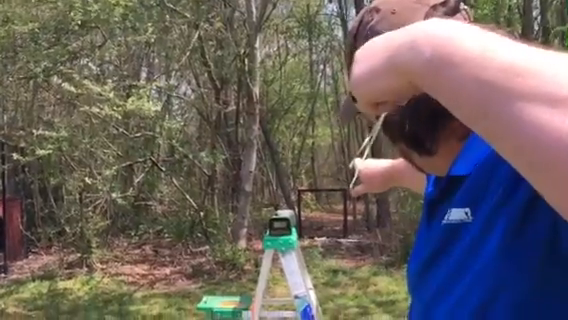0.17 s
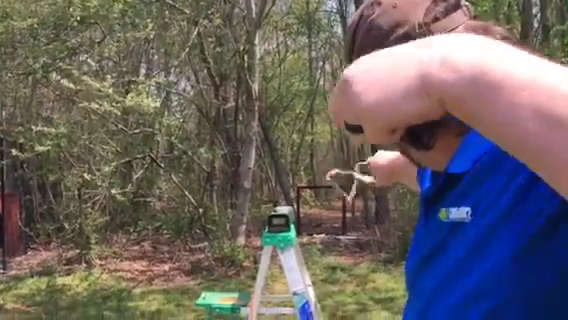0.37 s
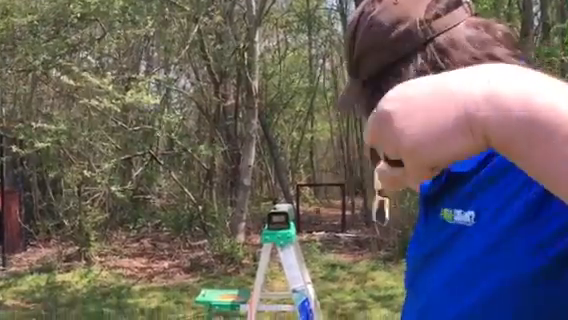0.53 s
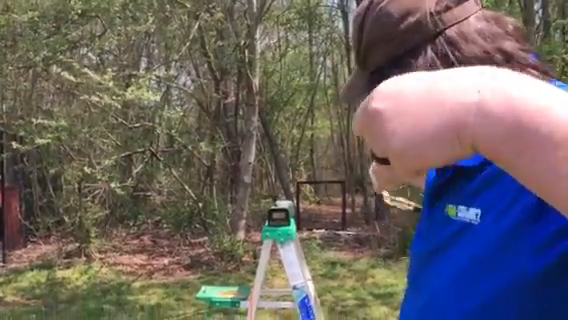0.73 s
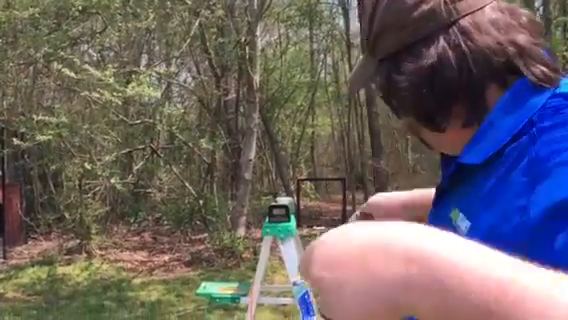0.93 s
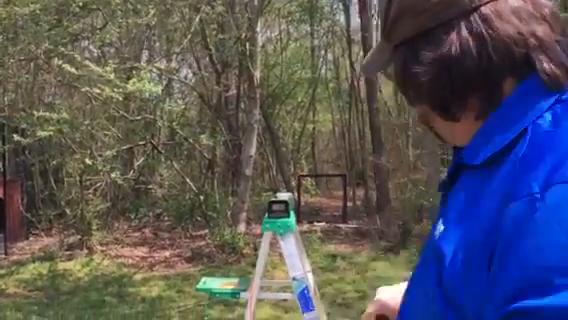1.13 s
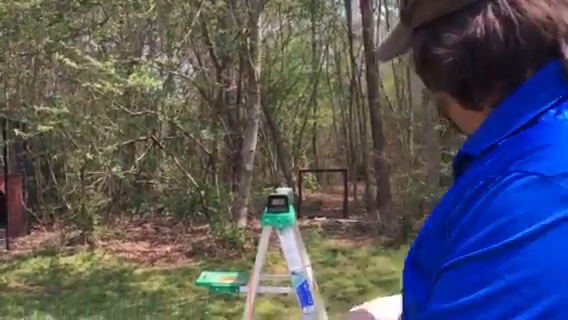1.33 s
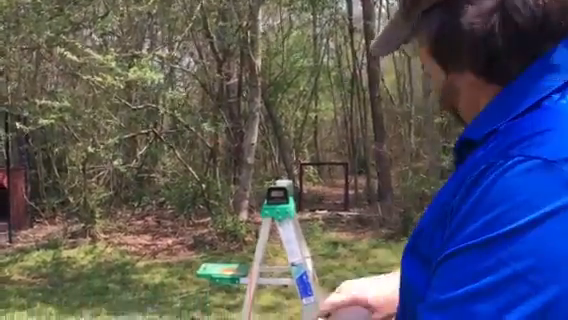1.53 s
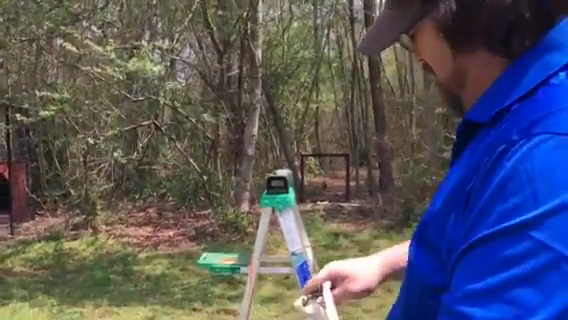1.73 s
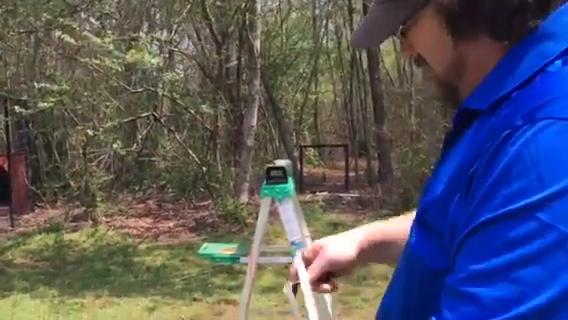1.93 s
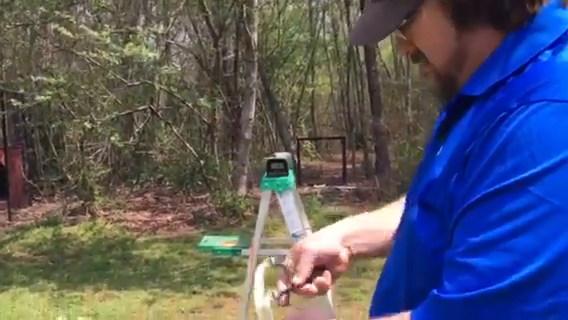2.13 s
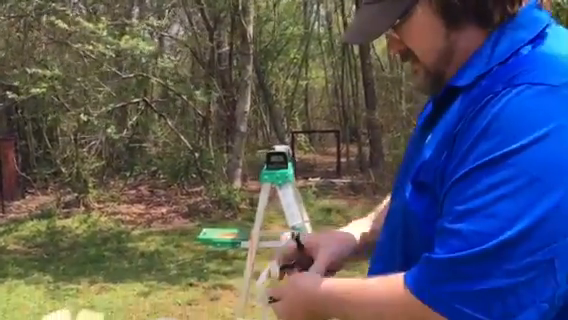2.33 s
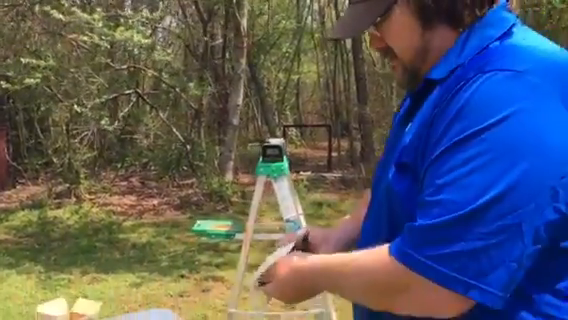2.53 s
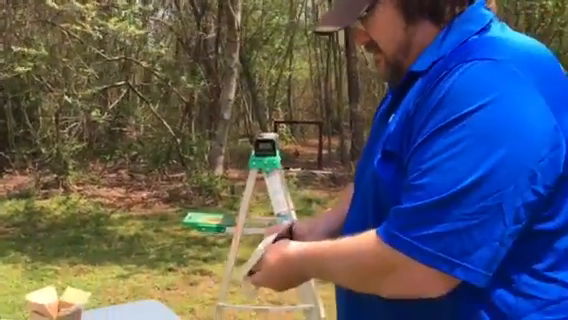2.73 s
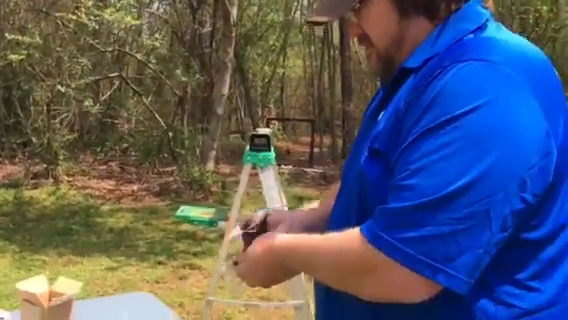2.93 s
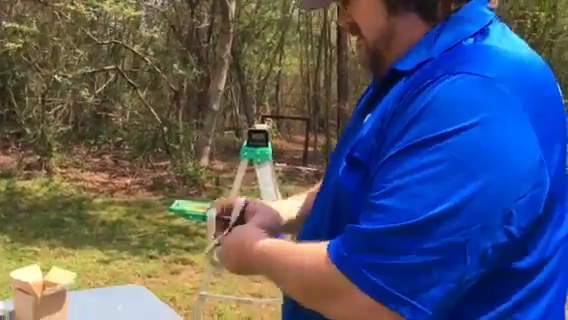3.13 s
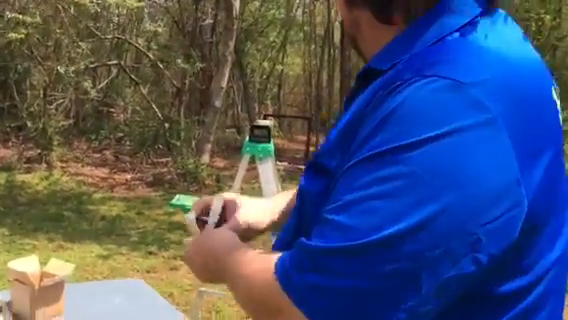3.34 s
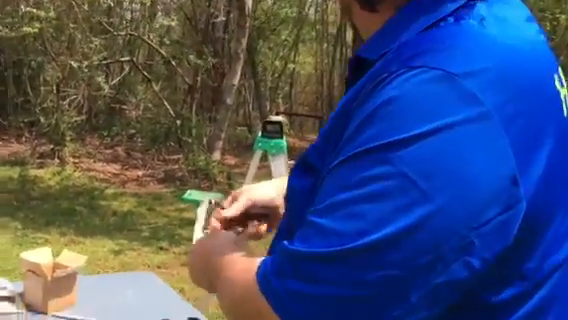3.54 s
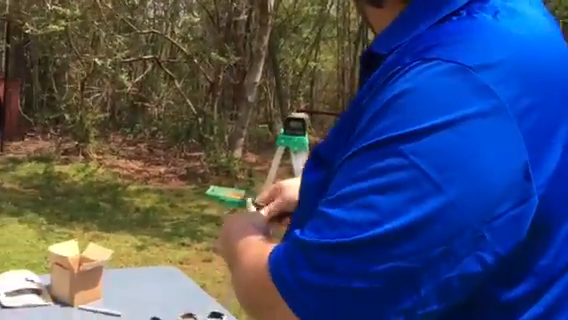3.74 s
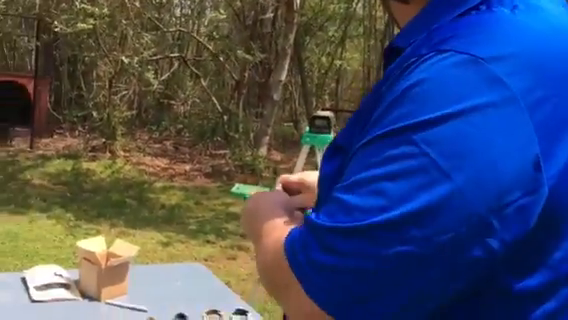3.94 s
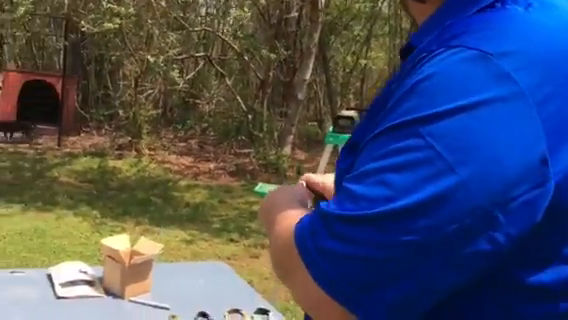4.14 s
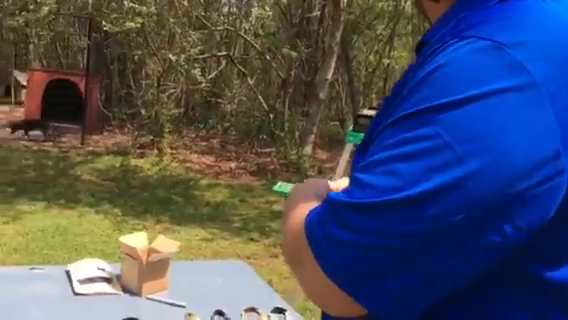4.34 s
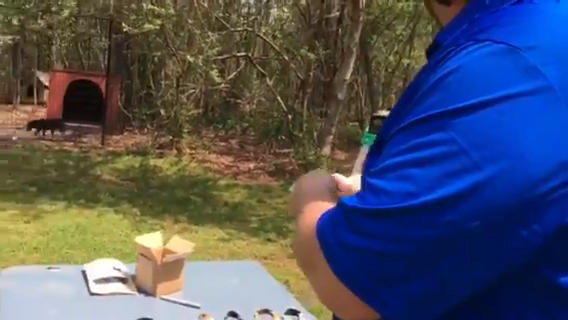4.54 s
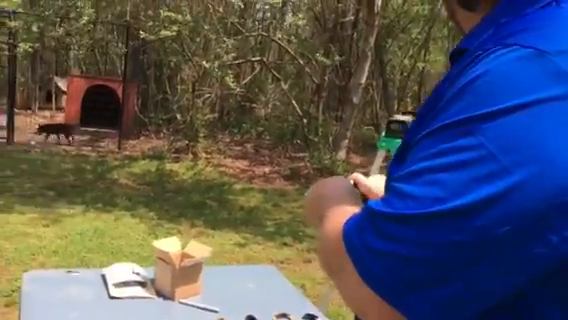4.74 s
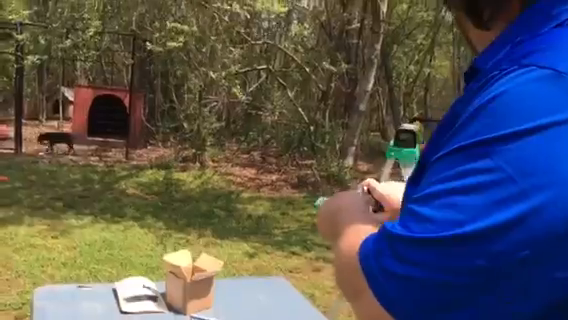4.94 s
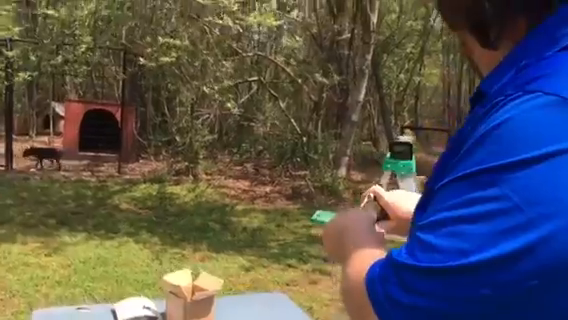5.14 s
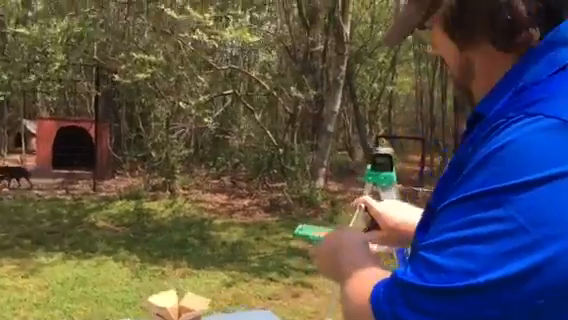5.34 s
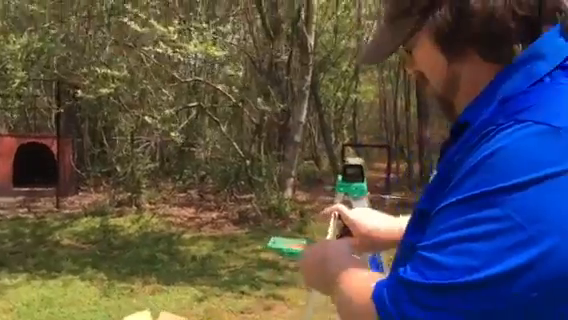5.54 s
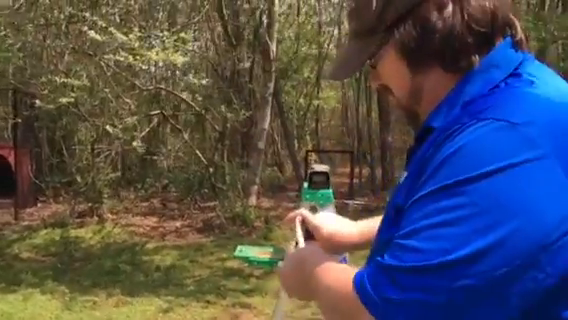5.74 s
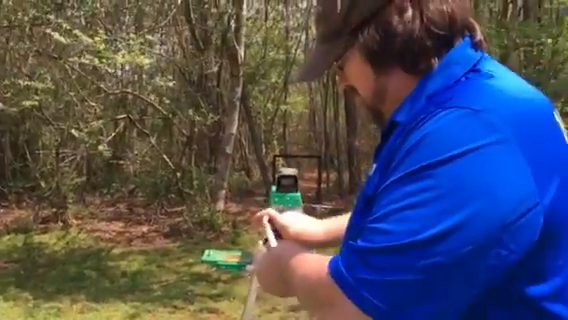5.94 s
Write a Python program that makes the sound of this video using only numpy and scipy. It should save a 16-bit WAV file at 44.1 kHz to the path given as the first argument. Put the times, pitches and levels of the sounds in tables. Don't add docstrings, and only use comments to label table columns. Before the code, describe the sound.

Sharp double rubber slap, then a bright metallic hit with a hissing echo off trees; the can tumbles, leaving quiet birds, wind and small rustles.

```python
import sys
import numpy as np
from scipy import signal
from scipy.fft import rfft, irfft, next_fast_len
from scipy.io import wavfile
from scipy.ndimage import uniform_filter1d, map_coordinates

SR = 44100
rng = np.random.default_rng(int(sys.argv[2]) if len(sys.argv) > 2 else 0)


def to_linear_factor(level_db):
    exponent = np.asarray(level_db, float) / 20
    return 10 ** exponent


def store_pcm(level_fs):
    pcm = np.round(np.clip(level_fs, -1, 1) * 32767).astype(np.int16)
    wavfile.write(sys.argv[1], SR, np.atleast_2d(pcm).T)


N = 268128
CLOCK = np.arange(N) / SR

# [t/s, swish level/dB]
WHIPS = [
    (.398, -32),
    (0.429, -43),
]
# [f/Hz, level/dB per Hz]
SWISH_COLOUR = [(180, -31.5), (300, -13), (737, -4), (1900, -14), (4670, -15), (5080, -16), (6410, -11),
                (16000, -19.5)]
# [t/s of the peak, level/dB, brightness 0-1, fall/s]
SLAPS = [(0.3705, -50.5, 0.8, 0.0016), (.378, -41, 0.45, 0.00047), (.388, -36, .6, .003),
         (0.397, -28.5, .1, 0.00087), (.4, -15, 0.74, 0.0019), (.4045, -19.5, 0.54, 0.0015),
         (0.408, -25, 0.9, 0.00082), (0.413, -32, 0.1, 0.0015), (0.4301, -15, .05, 0.0023),
         (0.4319, -24, .08, .001), (.435, -20.5, 0.46, 0.0015), (0.4369, -21.5, 0.4, .0012),
         (.44, -28.5, 0.01, .003)]
# [f/Hz, level/dB per Hz]
DULL_SLAP = [(180, -47), (300, -12), (1360, -18), (2320, -2.5), (3130, -8), (8790, -11.5), (10200, -13),
             (13300, -6.5), (16000, -15.5)]
BRIGHT_SLAP = [(180, -57.5), (300, -8), (3080, -9), (4370, -27), (6620, -3.5), (8500, -9), (10200, -12),
               (11700, -6.5), (16000, -12.5)]
# [t/s, level/dB]
POUCH_SNAPS = [
    (.4317, -6.5),
    (.4366, -11.5),
]
# [f/Hz, level/dB per Hz]
SLAP_SCATTER = [(290, -42.5), (500, -12), (545, -22.5), (631, -13.5), (1870, -10.5), (2190, -6.5),
                (3540, -4.5), (12100, -4.5), (16000, -18.5)]
SWISH_RISE_S, SWISH_FALL_S = 0.0085, 0.018
PUFF_S, PUFF_HOLD_S, PUFF_DB, PUFF_RISE_S, PUFF_FALL_S = 0.385, 0.041, -44, 0.0078, 0.015
FLAP_HZ, FLAP_DB = 185.3, -8
SLAP_RISE = 0.44

# [t/s, level/dB]
STRIKE = [
    (0.5765, -6.5),
    (.5767, -5),
    (.5775, -6.5),
    (0.579, -9),
    (0.582, -9),
]
# [f/Hz, level/dB per Hz]
CRACK = [(200, -40.5), (400, -9), (600, -3.5), (850, 0), (1250, -1.5), (1750, -14), (2450, -3), (3000, -13),
         (3600, -5.5), (6400, -2.5), (8500, -8.5), (12000, -10.5), (16000, -19.5)]
# [t/s, level/dB, ring level/dB, contact time/s, best-driven f/Hz]
BLOWS = [(0.5764, -15, -7, 0.00014, 2570), (.648, -43, 8, 0.0015, 3360), (.746, -34, -5.5, 0.0023, 1070),
         (1.022, -50.5, -1, 0.02, 3700), (1.073, -42.5, 0, 0.024, 3500), (1.099, -37.5, 2.5, 0.0018, 4230),
         (1.108, -39, 2, 0.0066, 1437), (1.146, -36, -15, 0.012, 3500), (1.272, -41.5, -6.5, 0.0047, 837),
         (1.3, -50, 3, 0.0019, 1437), (1.413, -52.5, 0, .002, 837), (1.465, -60.5, 7, 0.0024, 3400),
         (1.508, -64.5, 13.5, 0.0042, 4320), (1.689, -57, 6.5, 0.003066, 1516)]
# [f/Hz, level/dB, t60/s]
CAN_MODES = [(530, -8.5, 0.07), (837, -5.5, 0.31), (942, -5.5, 0.3), (1023, -12.5, 0.16), (1130, -6, .15),
             (1264, -2, 0.18), (1437, -4, 0.4), (1770, -6.5, 0.075), (2370, 0, 0.085), (2470, 0, 0.13),
             (2774, -8.5, .15), (3300, -1.5, .08), (3416, 3.5, 0.073), (3909, -1.5, 0.13),
             (4230, -1.5, .12), (5160, -1.5, 0.11), (5600, -2, 0.18), (5970, -3, .07), (6650, -0.5, 0.081),
             (7276, -2, 0.077)]
# [f/Hz, level/dB per Hz]
CLATTER = [(180, -53), (300, -28), (634, -15), (787, -17.5), (885, -6), (1720, -9.5), (3080, -6.5),
           (3350, -5), (3890, -6.5), (6960, -6.5), (16000, -18.5)]
ROLL = [(240, -59.5), (400, -38.5), (528, -3), (655, -22), (801, -3.5), (1440, -7), (2050, -6), (2500, -1),
        (4600, -2.5), (5000, -3), (9000, -6), (16000, -18)]
# [f/Hz, t60/s]
TREES = [(300, 0.16), (900, 0.64), (2000, 0.94), (4000, 0.59), (8000, .4), (14000, 0.3)]
TAIL_FOLLOWS, TAIL_UP_DB, TAIL_DOWN_DB = 0.6, 4, 0.5

# [t/s, level/dB, f/Hz, rise/s, t60/s]
PANEL_RINGS = [(.38, -43, 191, .004, 0.045), (.398, -33, 176, 0.0036, .05),
               (.43, -33.5, 170, 0.0027, 0.043), (.4295, -20, 3390, 0.001, 0.013),
               (.436, -28.5, 2270, .001, .012), (.647, -31, 3340, .002, 0.037),
               (.7465, -35, 1000, 0.0019, 0.037), (.749, -36, 3950, 0.0018, .04),
               (.584, -29, 1425, .003, .1), (.62, -37, 1130, 0.0046, .1), (.655, -38, 887, .004, 0.072),
               (0.709, -44, 1290, .005, .1), (.762, -43.5, 946, .004, 0.11), (.79, -44.5, 1440, .006, 0.18),
               (.83, -50, 1246, 0.0074, 0.18), (.8, -49, 897, 0.0054, 0.11),
               (1.073, -40.5, 3400, .006, .06), (1.075, -45, 4430, .005, .06),
               (1.088, -42, 2740, 0.0033, .06), (1.099, -37, 4400, .002, .05),
               (1.103, -45, 1450, 0.0049, .15), (1.085, -45, 1000, 0.0035, .06),
               (1.105, -49, 2486, 0.0036, .08), (1.105, -53, 800, .004, .12),
               (1.114, -42, 4310, .002, 0.058), (1.125, -43, 2800, .004, .08),
               (1.165, -47, 3300, .008, .08), (1.273, -45, 2570, 0.0035, 0.064),
               (1.276, -46, 832, .003, 0.058), (1.298, -47, 1460, 0.0027, .05)]
# [t/s, level/dB, rise/s per 10 dB, fall/s per 10 dB]
FORK_KNOCKS = [
    (3.05, -62.5, .03, 0.062),
    (3.105, -59, 0.0036, 0.0066),
]

# [t/s of the peak, level/dB, rise/s per 10 dB, fall/s per 10 dB, fullness 0-1]
STROKES = [(1.9, -70, .006, 0.06316, 0.36), (1.986, -65, 0.0091, 0.01418, 0.2915),
           (2.226, -69.5, .018, 0.068, 0.88), (2.68, -74, 0.22, 0.18, 0.55),
           (2.808, -64, 0.02593, 0.054, 0.31), (3.054, -52, 0.02, 0.022, 0.52),
           (3.075, -64, 0.016, 0.02, 0.58), (3.11, -69, .015, 0.17, 0.56),
           (3.77, -75.5, 0.0326, .04, 0.8137), (3.81, -61, 0.028, .025, .65),
           (4.668, -69.5, 0.068, 0.059, 0.36), (5.478, -53, 0.0088, 0.021, 0.32),
           (5.505, -58, 0.0093, 0.013, 0.48), (5.523, -49.5, 0.017, 0.0075, 1),
           (5.55, -78, 0.016, 0.047, 0.99), (5.879, -77.5, 0.098, .15, 0.66),
           (5.992, -67.5, 0.035, 0.15, 0.65)]
# [f/Hz, level/dB per Hz]
THIN_RUSTLE = [(2500, -18), (4500, -12), (6000, 5), (8000, 0.5), (11500, 2.5), (16000, -9)]
FULL_RUSTLE = [(470, -66), (800, -29), (1660, 1.5), (1850, -10), (2440, -4), (2800, -3.5), (6090, -7),
               (10600, -26), (12100, -31), (16000, -48)]
# [t/s, level/dB, f/Hz, broad crack level/dB]
TICKS = [(1.99, -68, 7970, -15.5), (2.059, -61.5, 4280, -15), (2.225, -69, 7147, -6),
         (2.553, -72.5, 11000, -3), (2.644, -65, 10000, -4), (2.657, -68, 6170, -10),
         (2.748, -59.5, 3020, -19), (2.838, -63, 11500, -2.5), (2.907, -71.5, 10600, -4),
         (2.94, -72, 11470, -8), (2.988, -71, 13000, -8), (3.212, -64, 5970, -2),
         (2.809, -57.5, 11250, -6.5), (3.053, -51.5, 4366, 4), (3.076, -59, 3126, -9.5),
         (3.101, -54, 2240, -16), (3.338, -55, 6880, 7), (3.34, -52.5, 1830, -7.5), (3.802, -61, 6470, -4),
         (4.989, -63, 4310, 5), (5.035, -69, 9000, -3), (5.475, -52, 8100, -7), (5.504, -53, 2350, 10),
         (5.518, -45.5, 1520, -16), (5.769, -66, 6560, -5)]
# [f/Hz, level/dB per Hz]
SNICK = [(700, -30), (2000, -3), (6000, -12), (11000, -8), (16000, -14)]

# [t/s, length/s, f/Hz, glide/Hz, level/dB]
HIGH_BIRD = [(0, .17, 7006, 201.2, -72.5), (5.55, 0.19, 7000, 199, -73)]
MID_BIRD = [(.04, 0.1, 3205, -52, -80), (.23, 0.12, 2990, 199, -74.5), (2.28, 0.16, 3270, 42, -76),
            (2.87, .18, 3184, 32.5, -73), (3.55, 0.13, 3075, 41.5, -69.5)]
LOW_BIRD = [(1.34, 0.067, 2630, 20, -58.5), (1.66, 0.075, 2614, -80, -62), (1.72, 0.089, 1890, -43, -68),
            (1.81, 0.095, 2480, 38, -63), (2.07, 0.065, 1680, 9.5, -66), (1.97, 0.12, 2520, 79, -73),
            (2.22, 0.086, 2065, -20, -66), (2.29, 0.096, 1790, 600, -63.5), (2.35, .06, 2305, 20.5, -61.5),
            (2.36, 0.16, 2510, -18.5, -64), (2.77, 0.062, 2430, -84, -68), (3.38, .055, 1990, -320, -68.5),
            (3.44, 0.053, 2370, 40, -63)]
THIN_BIRD = [(5.54, .22, 5540, -20, -81), (5.82, .09, 5930, 80, -78)]
HOARSE_BIRD = [(2.55, 0.15, 3474, -17, -70.5)]
# [t/s from start, f/Hz, level/dB]
SLUR = [(0, 2270, -8.5), (.012, 2269, 11.5), (.03, 2220, 7), (.055, 1900, 4.5), (.09, 1650, 2.5),
        (.125, 1506, 2.5), (.14, 1460, -27)]
PAIR = [(0, 3170, -12), (.012, 3245, 4), (.026, 3330, 2), (.036, 3562, 5), (.07, 3582, -3), (.13, 3560, -4),
        (.18, 3523, -9.5), (.32, 3510, -22)]
CHIP = [(0, 3896, -5), (.004, 3590, 4.5), (.011, 3302, -2), (.024, 3148, -12)]
# [t/s, level/dB]
SLURS = [(3.85, -72), (4.255, -71), (4.634, -67.5), (5.015, -69), (5.4, -70)]
PAIRS = [(3.775, -79), (4.17, -74), (4.55, -75), (4.925, -72), (5.315, -72.5)]
CHIPS = [(.022, -71), (.288, -65.5), (1.608, -65), (1.756, -68.5), (1.906, -66), (2.207, -65.5),
         (2.352, -69), (2.51, -65)]
NOTE_PEAK, NOTE_START_DB, NOTE_END_DB = 0.72, -2, -14
# [t/s, level/dB]
CHORUS = [
    (1.35, -94),
    (1.7, -67),
    (1.95, -74),
    (2.35, -74.5),
    (2.7, -79),
]

# [t/s, level/dB]
WIND = [(0, -67), (.42, -58), (.8, -61), (1.2, -59), (1.285, -52), (1.37, -60), (1.7, -63), (3, -62.5),
        (4.9, -63.5), (5.3, -57), (6.08, -58)]
# [f/Hz, level/dB per Hz]
BUFFET = [(12, -30.5), (25, -12), (40, -1), (55, 1), (75, -5.5), (95, -10), (140, -47)]
RUMBLE = [(41, -35), (70, 1), (103, 1), (259, -10.5), (329, -18.5), (357, -20), (500, -39), (650, -51),
          (1100, -120)]
LEAVES = [(180, -34), (300, -4), (1230, -8), (1450, -9.5), (1580, -10.5), (2090, -13.5), (3090, -18.5),
          (5000, -29.5), (6500, -54.5), (11000, -120)]
HISS = [(1760, -32), (3000, -10), (3750, -11.5), (4260, -5.5), (5000, -13), (5600, -4), (6300, -7),
        (9400, -11), (16000, -19.5)]
BUFFET_DB, RUMBLE_DB, LEAVES_DB, HISS_DB = 0.5, -59.5, -66, -79.5
LATE_S, LATE_LEAVES_DB, LATE_HISS_DB, LATE_DB_PER_S = 0.59, -60.5, -62, 18.5
# [f/Hz, level/dB]
MIC = [(20, 0), (2550, -0.5), (2850, -3), (3100, 0.5), (9300, -0.5), (10400, -4.5), (11400, -1.5),
       (14500, -1.5), (15800, -2), (16000, -39), (16800, -59)]


def bands():
    speed = sum(to_linear_factor(db) * swell(s, SWISH_RISE_S, SWISH_FALL_S) for s, db in WHIPS)
    out = speed * to_linear_factor(3.4 * wobble(400)) * noise(SWISH_COLOUR)
    puff = to_linear_factor(PUFF_DB) * swell(PUFF_S, PUFF_RISE_S, PUFF_FALL_S, PUFF_HOLD_S)
    out += puff * noise([(50, -16), (130, -4.0), (210, -1.0), (300, -16.5), (1200, -39.5)])
    out += puff * to_linear_factor(FLAP_DB) * np.sin(2 * np.pi * FLAP_HZ * CLOCK + 0.9 * wobble(40))
    t = CLOCK[:SR // 25] - 0.01
    for s, db, bright, fall in SLAPS:
        turn = bright * np.pi / 2
        burst = np.cos(turn) * noise(DULL_SLAP, len(t)) + np.sin(turn) * noise(BRIGHT_SLAP, len(t))
        side = np.where(t < 0, SLAP_RISE * fall, fall)
        add(out, s + t[0], to_linear_factor(db) * np.exp(-np.abs(t / side) ** 0.81) * burst)
    snap = pulse([(400, -30.5), (2000, -8.5), (3400, 4.5), (5000, -13.5), (13000, -10.5), (16000, -15.5)])
    for s, db in POUCH_SNAPS:
        add(out, s, to_linear_factor(db) * snap)
    t = CLOCK[:SR // 2]
    for s, db in [(0.402, -46), (0.434, -41)]:
        add(out, s, to_linear_factor(db) * tail(SLAP_SCATTER, len(t)) * (1 - np.exp(-t / 0.0061)))
    return out


def can():
    out, t = np.zeros(N), CLOCK[:3 * SR // 4]
    for k, (s, db) in enumerate(STRIKE):
        add(out, s, (-1) ** k * to_linear_factor(db) * pulse(CRACK))
    thud = noise([(120, -30.5), (250, -4.5), (380, -1), (650, -2.5), (900, -31.5)], len(t))
    add(out, STRIKE[0][0], to_linear_factor(-32.5 - 60 * t / 0.05) * thud * (1 - np.exp(-t / 0.0014)))
    for s, db, ring_db, contact, best_hz in BLOWS:
        down = s > 1
        colour = ROLL if down else CLATTER
        ring = shell_ring(t, best_hz, down)
        crack = to_linear_factor(-60 * t / (0.012 + 6 * contact)) * noise(colour, len(t))
        rattle = to_linear_factor(-2.0 - 60 * t / 0.07) * noise(colour, len(t))
        grain = to_linear_factor(1.4 * wobble(250, len(t)))
        wood = grain * tail(colour, len(t)) * (1 - np.exp(-t / 0.004))
        echo = to_linear_factor(TAIL_FOLLOWS * ring_db + (TAIL_DOWN_DB if down else TAIL_UP_DB) - 12.0) * wood
        blow = crack + rattle + to_linear_factor(ring_db - 5.5) * ring + echo
        add(out, s, to_linear_factor(db) * blow * (1 - np.exp(-t / contact)))
    return out


def shell_ring(t, best_hz, down):
    damping, focus = (2.2, 16) if down else (1.1, 5)
    flex = 0.8 * wobble(70, len(t))
    ring = np.zeros(len(t))
    for hz, level, t60 in CAN_MODES:
        a, b = rng.standard_normal(2)
        mode_db = level + 0.97 * a - focus * abs(np.log2(hz / best_hz)) - 60 * damping * t / t60
        ring += to_linear_factor(mode_db) * np.sin(2 * np.pi * hz * t + 3 * b + np.roll(flex, int(a * SR)))
    return ring


def panels():
    out, t = np.zeros(N), CLOCK[:SR // 5]
    for s, db, hz, rise, t60 in PANEL_RINGS:
        shape = (1 - np.exp(-t / rise)) ** 2 * to_linear_factor(2.5 - 60 * t / t60 + 1.7 * wobble(120, len(t)))
        phase = 2 * np.pi * hz * t + min(hz / 900, 1.1) * wobble(220, len(t))
        add(out, s, to_linear_factor(db) * shape * np.sin(phase))
    return out


def hands():
    out, t = np.zeros(N), CLOCK[:SR // 20]
    grain = to_linear_factor(2.5 * wobble(300) + 0.91 * wobble(75))
    thin, full = unit(grain * noise(THIN_RUSTLE)), unit(grain * noise(FULL_RUSTLE))
    for s, db, rise, fall, fullness in STROKES:
        turn = fullness * np.pi / 2
        out += to_linear_factor(db) * swell(s, rise, fall) * (np.cos(turn) * thin + np.sin(turn) * full)
    for s, db, hz, crack_db in TICKS:
        ping = to_linear_factor(-60 * t / 0.034) * noise([(hz * 0.58, -30), (hz, 0), (hz * 1.5, -30)], len(t))
        crack = to_linear_factor(crack_db - 60 * t / 0.014) * noise(SNICK, len(t))
        add(out, s, to_linear_factor(db) * (1 - np.exp(-t / 0.00055)) * (ping + crack))
    return out


def grip():
    level = sum(to_linear_factor(db) * swell(s, rise, fall) for s, db, rise, fall in FORK_KNOCKS)
    return level * noise([(100, -30), (200, -1), (600, -2.5), (1000, -8), (1600, -30)])


def birds():
    clear = flock(notes(HIGH_BIRD) + repeat(SLUR, SLURS), blur=0.4, wet_db=-14)
    middle = flock(notes(MID_BIRD + THIN_BIRD), blur=1.0, wet_db=0)
    chips = flock(repeat(CHIP, CHIPS), blur=0.7, wet_db=-10)
    hoarse = flock(notes(HOARSE_BIRD), blur=1.8, wet_db=0)
    pairs = flock(repeat(PAIR, PAIRS), blur=1.1, wet_db=-1)
    low = to_linear_factor(-6) * flock(notes(LOW_BIRD), blur=1.2, wet_db=-2)
    return clear + middle + chips + hoarse + pairs + low


def flock(calls, blur, wet_db):
    out, tremble, drift = np.zeros(N), wobble(70), wobble(180)
    for rows in calls:
        where, (hz, db) = span(rows)
        i = np.arange(len(db))
        edge = np.clip(np.minimum(i, i[::-1]) / (0.002 * SR), 0, 1)
        phase = 2 * np.pi * np.cumsum(hz) / SR + blur * drift[where]
        out[where] += np.sqrt(2) * to_linear_factor(db + 2.2 * blur * tremble[where]) * edge * np.sin(phase)
    wood = to_linear_factor(-60 * CLOCK[:SR // 2] / 0.43) * rng.standard_normal(SR // 2)
    return 0.53 * out + to_linear_factor(wet_db) * signal.fftconvolve(out, wood / np.linalg.norm(wood))[:N]


def notes(rows):
    steps = [(0, NOTE_START_DB), (NOTE_PEAK, 0), (1, NOTE_END_DB)]
    return [[(s + u * length, hz + u * glide, db + step) for u, step in steps]
            for s, length, hz, glide, db in rows]


def repeat(shape, times):
    return [np.array(shape) + (s, 0, db) for s, db in times]


def chorus():
    out = np.zeros(N)
    where, (db,) = span(CHORUS)
    band = noise([(1300, -24.5), (1800, -2.5), (2550, -1.0), (2800, -22.5)], len(db))
    out[where] = to_linear_factor(db + 3.0 * wobble(25.2, len(db))) * band
    return out


def air():
    gust_db, = span(WIND)[1]
    late = swell(LATE_S, 0.006, 10 / LATE_DB_PER_S)
    buffet = to_linear_factor(gust_db + BUFFET_DB + 2.5 * wobble(19)) * noise(BUFFET)
    rumble = to_linear_factor(RUMBLE_DB + 1.0 * wobble(5.2)) * noise(RUMBLE)
    leaves_level = np.hypot(to_linear_factor(LEAVES_DB), to_linear_factor(LATE_LEAVES_DB) * late)
    leaves = leaves_level * to_linear_factor(1.3 * wobble(5)) * noise(LEAVES)
    hiss_level = np.hypot(to_linear_factor(HISS_DB), to_linear_factor(LATE_HISS_DB) * late)
    hiss = hiss_level * to_linear_factor(0.7 * wobble(6.8)) * noise(HISS)
    return buffet + rumble + leaves + hiss


def tail(spectrum, count):
    hz, t, z = signal.stft(noise(spectrum, count), SR, nperseg=512)
    uneven = uniform_filter1d(rng.standard_normal(z.shape), size=24, axis=1)
    bands_db = 2.3 * unit(uneven) - 0.6
    z = z * to_linear_factor(bands_db - 60 * t / along(TREES, hz)[:, None])
    return signal.istft(z, SR, nperseg=512)[1][:count]


def pulse(spectrum):
    cepstrum = irfft(along(spectrum, np.fft.rfftfreq(2048, 1 / SR)) * np.log(10) / 20)
    cepstrum[1:1024] *= 2
    click = irfft(np.exp(rfft(cepstrum[:1025], 2048)))[:1024]
    return click / np.abs(click).max()


def swell(s, rise, fall, hold=0):
    t = CLOCK - s
    return to_linear_factor(-10 * np.maximum(-t / rise, np.maximum(t - hold, 0) / fall))


def noise(spectrum, count=N):
    m = next_fast_len(count + 4096)
    gain = to_linear_factor(along(spectrum, np.fft.rfftfreq(m, 1 / SR)))
    return unit(irfft(rfft(rng.standard_normal(m)) * gain, m)[:count])


def wobble(rate, count=N):
    knots = rng.standard_normal(int(count * rate / SR) + 4)
    return map_coordinates(knots, [CLOCK[:count] * rate])


def unit(x):
    return x / np.sqrt(np.mean(x ** 2) + 1e-20)


def along(points, hz):
    f, v = np.transpose(points)
    return np.interp(np.log(hz + 1), np.log(f + 1), v)


def span(rows):
    s, *cols = np.transpose(rows)
    where = slice(max(round(s[0] * SR), 0), min(round(s[-1] * SR), N))
    return where, [np.interp(CLOCK[where], s, c) for c in cols]


def add(track, s, sound):
    part = track[max(round(s * SR), 0):][:len(sound)]
    part += sound[:len(part)]


def scene():
    near = bands() + can() + panels() + hands() + grip()
    return (near + birds() + chorus() + air())[None]


def roll_off(x):
    return signal.sosfilt(signal.butter(12, 16810, fs=SR, output="sos"), x)


def record(dry):
    colour = to_linear_factor(along(MIC, np.fft.rfftfreq(2 * N, 1 / SR)))
    mix = irfft(rfft(dry, 2 * N) * colour)[:, :N]
    return roll_off(mix)


dry = scene()
out = record(dry)
store_pcm(out)
```